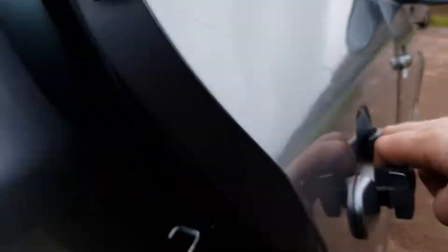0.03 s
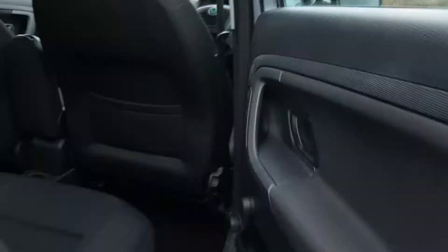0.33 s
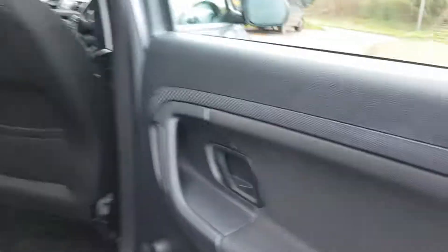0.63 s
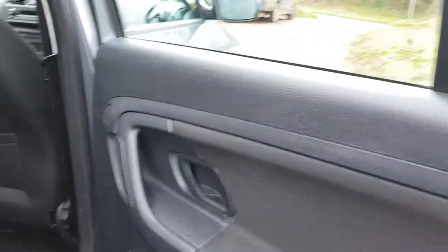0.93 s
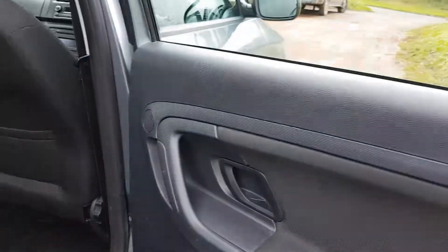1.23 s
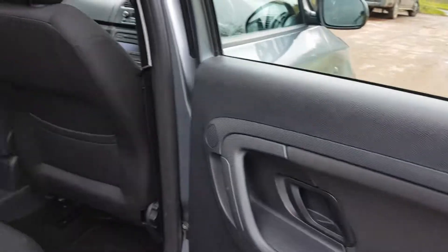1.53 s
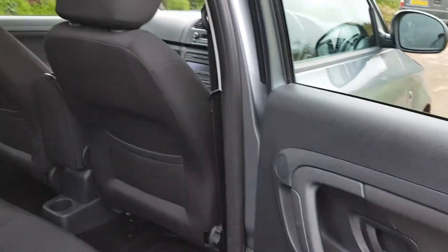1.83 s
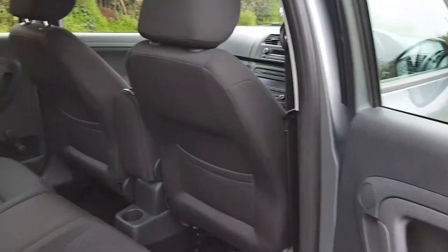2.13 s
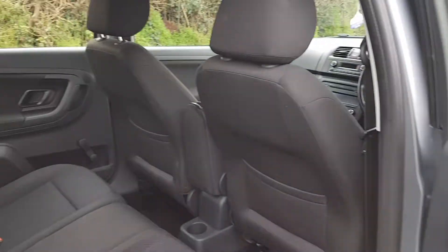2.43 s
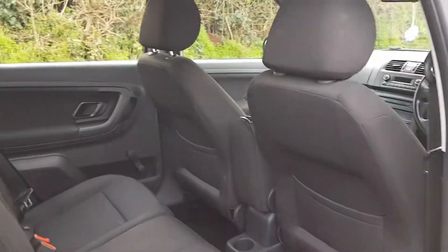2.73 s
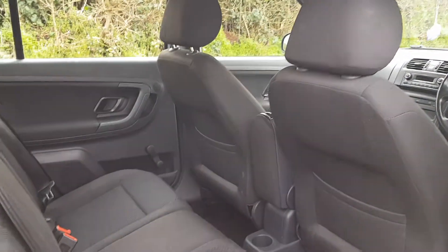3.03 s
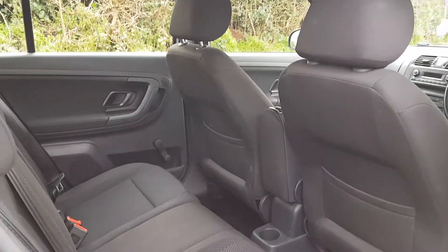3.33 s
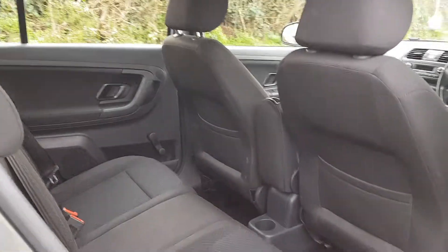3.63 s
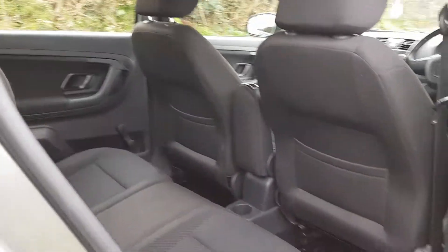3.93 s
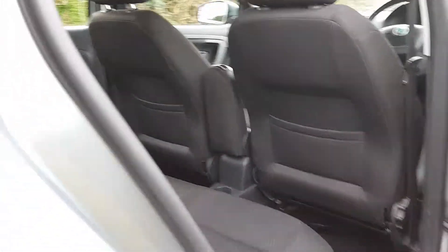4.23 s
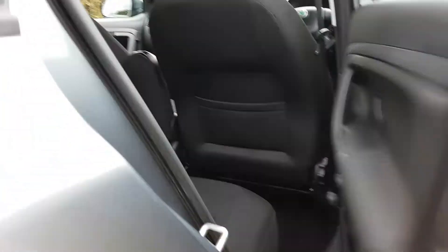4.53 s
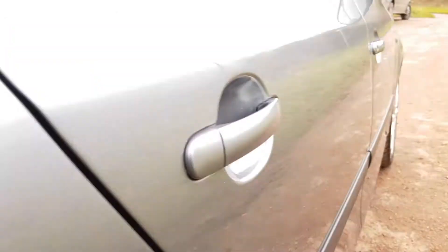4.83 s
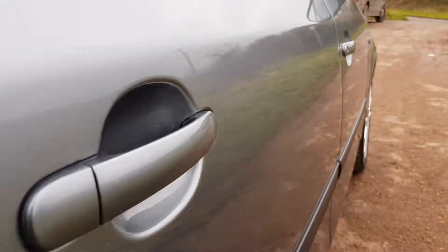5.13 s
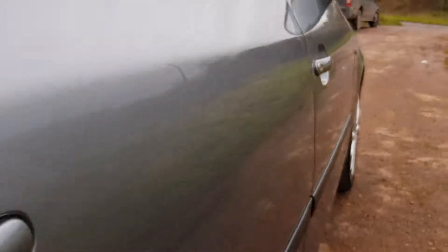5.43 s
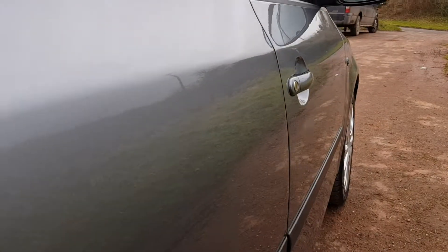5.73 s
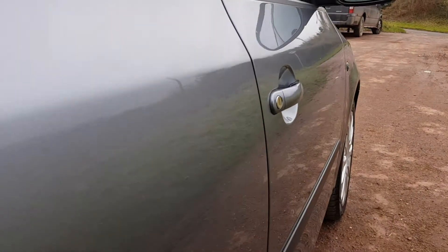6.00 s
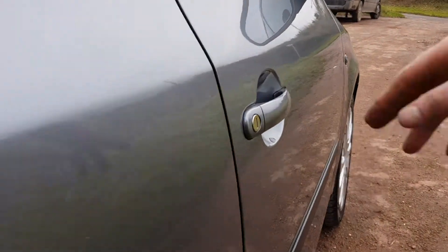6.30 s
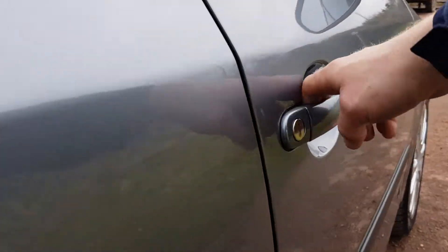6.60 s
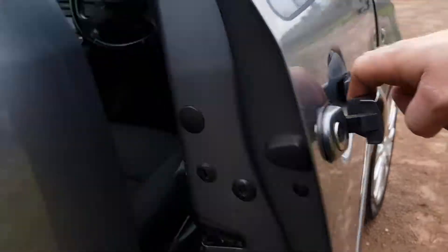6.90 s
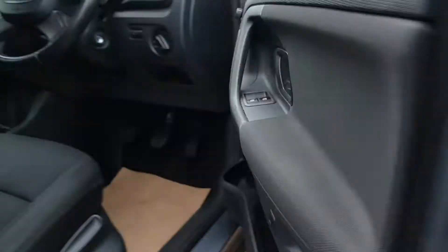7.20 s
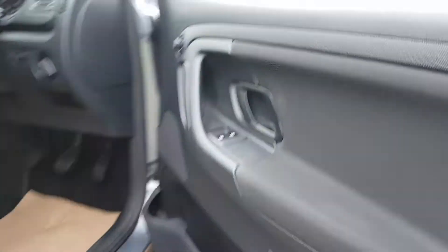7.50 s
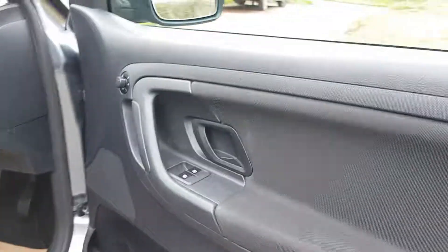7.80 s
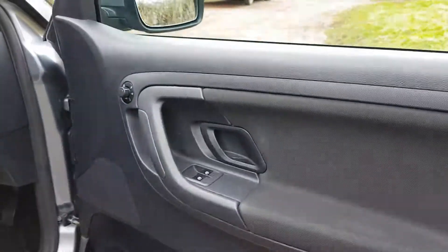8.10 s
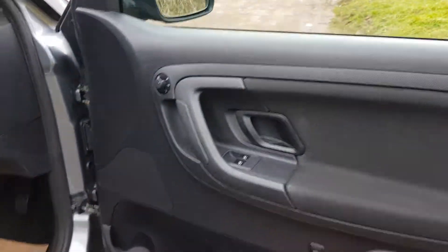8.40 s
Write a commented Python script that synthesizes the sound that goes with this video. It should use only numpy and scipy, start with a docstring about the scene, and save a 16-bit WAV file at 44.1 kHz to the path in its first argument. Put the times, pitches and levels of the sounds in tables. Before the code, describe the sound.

Wind buffets a hand-held microphone beside a parked car, with strong, low rumbling and irregular thumps for the first two seconds. At about 0.35 seconds a car door unlatches close by with a short clunk. Small birds chirp faintly from around 0.8 to 2.1 seconds. The wind nearly drops away at 2.5 seconds, then returns in lighter puffs, while faint tyre noise drifts from a distant road on the right. From 4.4 seconds the hinge ticks and creaks softly, and at about 4.85 seconds the door slams with a solid thud and a metallic latch crack. A sleeve rustles softly near the microphone. Around 6.4 seconds a handle starts clicking, and at 6.75 a second door opens with a sharp latch clack and a hollow thump. A light knock follows at 7.2 seconds amid more gusts, then a few small ticks until about 8.4 seconds.

```python
"""Wind hits the microphone first: gusts and eddies buffet its two ports, hand-held beside a parked car. Close
by, the rear door is unlatched and later slammed; then the front handle is pulled and that door opens. Each blow
rings the door panels and cracks in the steel latch; the slam puffs air from the seal. A sleeve rustles near the
microphone, small birds call from the hedge and tyres rush on a distant road to the right. Faint tyre tones and
high whines come and go, and a hinge creaks before the slam."""
import sys
import numpy as np
from scipy import signal
from scipy.fft import rfft, irfft, next_fast_len
from scipy.io import wavfile
from scipy.ndimage import uniform_filter1d

SR = 44100
rng = np.random.default_rng(int(sys.argv[2]) if len(sys.argv) > 2 else 0)


def master_out(mix):
    """Clip the mix to full scale and print it as 16-bit PCM to the path in sys.argv[1]."""
    frames = np.transpose(np.atleast_2d(mix))
    ceiling = np.clip(frames, -1, 1)
    pcm = np.round(ceiling * 32767).astype(np.int16)
    wavfile.write(sys.argv[1], SR, pcm)


N = 381553

# Levels are relative within each layer, spectra are per Hz, and pan runs from 0 (left) to 1 (right).
# traffic on the distant road: t/s, level/dB
ROAD_LEVEL = [(2.45, -50), (3.05, -42), (3.7, -45), (4.6, -38.5), (5.9, -44), (6.45, -36.5), (7.1, -38.5),
              (7.5, -46.5), (8.3, -41.5)]
# spectra of far tyres and of open air: f/Hz, level/dB
TYRE_SPECTRUM = [(30, -9), (120, 4), (270, -14), (380, -4.5), (520, -19), (720, -2.5), (920, 5),
                 (1200, -0.5), (1550, -7), (1850, -8.5), (2400, -18), (3100, -32), (6000, -67),
                 (16000, -43)]
AIR_SPECTRUM = [(30, 1), (150, -18), (300, -5), (390, 5.5), (510, -3), (700, 8.5), (1200, -22),
                (2800, -25.5), (5000, -52), (7500, -35.5), (9000, -51), (16000, -42)]
# faint thin, wavering bands of noise (tones from the distant road's tyres, a hinge creak before the slam, high
# whines): t/s, length/s, f/Hz, width/Hz, level/dB
THIN_WHINES = [(1.799, 0.72, 730, 110, -62), (2.6, 0.77, 487, 110, -56.5), (3.743, 0.42, 1870, 150, -58.5),
               (4.371, 0.33, 1840, 220, -62), (4.423, 0.17, 2500, 300, -64), (4.511, 0.27, 3110, 900, -61),
               (4.461, 0.15, 4800, 900, -63.5), (7.7, .5, 3700, 400, -69), (7.716, .48, 5800, 300, -75),
               (8.051, .7, 1080, 200, -54.5)]

# quick bird notes from the hedge: t/s, length/s, start f/Hz, end f/Hz, level/dB
BIRD_CHIRPS = [(0.75, 0.034, 5120, 4730, -56), (0.864, 0.041, 5900, 5900, -58),
               (1.028, .02, 5430, 4900, -65), (1.078, 0.024, 6270, 4100, -50.5),
               (1.091, .016, 6150, 5300, -52.5), (1.148, 0.02, 5300, 3950, -49),
               (1.185, .018, 6100, 5800, -63), (1.215, .018, 5430, 4400, -61),
               (1.245, 0.018, 5400, 3770, -53), (1.306, 0.027, 5600, 3740, -46.5),
               (1.352, .018, 5400, 4530, -57), (1.41, 0.022, 6400, 4300, -49.5),
               (1.42, 0.24, 4900, 4250, -69)]
# thin, raspy high calls: t/s, length/s, f/Hz, upward bow/Hz, rasp/Hz, level/dB
BIRD_SEEPS = [(1.777, .08, 7610, 359, 260, -51.5), (1.945, .035, 7380, 0, 80, -68),
              (2.026, .108, 7230, 60, 130, -56), (5.654, .22, 8230, 100, 250, -67)]

# cloth moving with the arm, close to the microphone: t/s, rub/dB, hiss/dB
SLEEVE_LEVEL = [(0, -64, -80.5), (.95, -65, -74.5), (1.1, -67, -87), (2.6, -76, -88.5), (3.65, -66, -86),
                (4.3, -60, -75.5), (4.62, -58, -67.5), (5.05, -60.5, -82), (5.95, -67, -87.5),
                (6.07, -59, -71), (6.45, -55, -65), (6.9, -55, -69.5), (7.05, -60, -70), (8.12, -57, -70.5),
                (8.23, -61.5, -65.5), (8.65, -58, -70)]
# quick brushes of cloth, and a short scrape just before the latch gives: peak t/s, length/s, rub/dB, hiss/dB
SLEEVE_BRUSHES = [(0.246, 0.047, -61, -77), (0.342, .024, -46, -65.5), (0.82, 0.079, -53.5, -90),
                  (3.516, 0.24, -59, -71.5), (3.957, 0.083, -69, -71), (6.703, .08, -45.5, -72)]
# spectra of the rub and of the fine hiss, which also tops the clicks: f/Hz, level/dB
RUB_SPECTRUM = [(1200, -8.5), (2400, 2.5), (3000, 1), (3700, -0.5), (4400, 0), (5700, -5), (6800, -6),
                (10000, -16), (16000, -39)]
HISS_SPECTRUM = [(4000, -6.5), (7500, -5.5), (10500, -4.5), (13000, -4), (16000, -9)]

# wind at the microphone: t/s, level/dB
WIND_LEVEL = [(0, -16), (.15, -25), (.39, -14), (.45, -17), (.472, -22.5), (.5, -20), (.79, -21.5),
              (.825, -38), (.88, -21.5), (1.1, -20), (1.18, -36), (1.27, -30.5), (1.5, -24), (1.59, -21),
              (1.71, -33.5), (1.88, -28), (1.945, -40.5), (1.98, -33.5), (2.2, -36.5), (2.24, -48),
              (2.56, -72.5), (2.64, -49), (2.9, -47), (3.2, -39.5), (3.65, -38), (3.88, -39), (4.15, -36),
              (4.75, -36.5), (5.12, -50.5), (5.55, -35.5), (5.85, -36), (6.28, -27), (6.42, -36.5),
              (6.95, -34), (7.17, -25), (7.8, -42.5), (8.22, -37.5), (8.6, -52.5)]
# which port faces the wind: t/s, left minus right/dB
WIND_BALANCE = [(0, -0.5), (.45, 1.5), (.65, -12.5), (1.05, 5.5), (1.29, 23), (1.37, 8), (1.6, -7.5),
                (2.0, 0)]
# puffs that stand out of the wind: peak t/s, length/s, level/dB, pan
WIND_PUFFS = [(0.146, 0.17, -16, 0.35), (0.212, 0.051, -14.5, 0), (0.861, 0.11, -24, 1),
              (1.101, 0.1, -21, 0.019), (1.382, 0.072, -17.5, 0.65), (1.493, 0.1, -23, 1),
              (1.777, 0.11, -24.5, 0.93), (1.861, 0.089, -26, 0.58), (2.623, 0.044, -34.5, 0.52),
              (2.736, 0.043, -40.5, 0.067), (3.179, 0.22, -33.5, 0.52), (3.416, 0.053, -31.5, 0.49),
              (3.472, 0.13, -30, 0.46), (3.797, 0.19, -38, 0.5), (4.674, 0.059, -28.5, 0.46),
              (5.45, 0.13, -29, 0.29), (5.661, 0.0294, -24.5, 0.52), (6.029, 0.082, -25.5, 0.59),
              (6.592, 0.0923, -25.5, 0.73), (6.808, 0.049, -28.5, 0.61), (6.915, 0.0274, -26.5, 0.92),
              (7.092, 0.062, -22, 0.2), (7.188, 0.163, -22.5, 0.036), (7.368, 0.1, -29, 0.29),
              (7.507, 0.15, -23, 0.455), (7.653, 0.11, -29, 0.18), (8.144, 0.217, -37, 0.93)]
# spectra of buffeting in strong and in light flow, and of an eddy's flutter: f/Hz, level/dB
STRONG_FLOW_SPECTRUM = [(15, -40.5), (35, -8.5), (80, 1.5), (170, -2), (280, -6.5), (500, -17),
                        (900, -34.5), (1500, -47.5), (2500, -61.5), (4000, -82.5), (8000, -100)]
LIGHT_FLOW_SPECTRUM = [(15, -24), (35, -10.5), (80, -0.5), (130, -1), (230, -5), (370, -2.5), (550, -8),
                       (900, -16), (1500, -28.5), (2500, -52.5), (4000, -52), (8000, -100)]
FLUTTER_SPECTRUM = [(150, 8), (450, 3.5), (1000, -5), (1800, -11.5), (3000, -31), (4200, -57.5)]
# single eddies that slap the ports, and short scuffs near 8.1 s: t/s, level/dB, pan
EDDY_SLAPS = [(.055, -15, 0.74), (.096, -17, 0.75), (.298, -26, .7), (0.1856, -10, 0.0043),
              (0.202, -9, 0.026), (0.233, -4.5, 0.97), (.406, -9, 0.041), (.432, -7, 0), (.442, -8, 0.067),
              (0.516, -11, 0), (0.5782, -1.5, 0.91), (0.619, -10, 1), (0.626, -4, 0.96),
              (0.63, -2.5, 0.994), (.7, -10, 1), (0.806, -18.5, 0.71), (0.8392, -14.5, 0.68),
              (0.844, -22, 0.61), (0.848, -3.5, 0.96), (0.8506, -17, 0.61), (0.863, -7, 1),
              (0.952, -15, 0.087), (0.972, -14.5, 0.95), (0.995, -14.5, 0.26), (1.042, -19, .5),
              (1.371, -12, .8), (1.39, -13.5, 1), (1.483, -18.5, .9), (1.555, -16.5, 0.98), (1.587, -5, 1),
              (1.76, -21, 0.67), (1.888, -21, .8), (1.992, -24, 0.73), (2.08, -23.5, 0.077),
              (3.404, -23, 0.85), (4.064, -18.5, 1), (4.09, -19.5, 0.97), (4.191, -15, 0.98),
              (4.669, -16, 0.94), (5.454, -11.5, 0.99), (6.021, -25, 0.17), (6.199, -18, 0.32),
              (7.009, -15, 0.47), (7.364, -11.5, 1), (7.374, -13.5, 0.98), (7.491, -11, 1),
              (7.528, -18, .3), (8.096, -21.5, 0.91), (8.123, -18, 0.86), (8.15, -17.5, .8)]
# large eddies, each a hollow bump: t/s, level/dB, f/Hz, pan
EDDY_BUMPS = [(0.154, -3.5, 196, 0), (0.187, -0.5, 180, 0.0), (0.3, -9.5, 250, 0.76), (0.312, -6, 150, 0.5),
              (0.442, -3, 267, 0.03), (0.497, -5.5, 237.5, 0.48), (0.854, -1, 140, 1.0),
              (1.115, -12.5, 207.5, 0), (1.378, -11, 240, 1), (1.492, -17, 150, 0.68),
              (1.666, -10.5, 167, 0.65), (3.163, -16, 285, 1), (3.406, -9.5, 416, 0.71),
              (3.494, -13.5, 328, 0.45), (3.704, -15.5, 364, 0.69), (3.786, -19.5, 252, 0.6),
              (4.139, -16.5, 328, 0.42), (5.424, -12, 317, 0.6), (5.455, -19, 358, 1),
              (5.485, -13, 435, 0.036), (5.613, -19, 392, 1), (5.67, -14.5, 506, 1),
              (6.018, -6.5, 380, 0.63), (6.028, -10.5, 352, 0.051), (6.213, -7, 443, 0.41),
              (6.233, -10.5, 396, 0.73), (6.3, -11.5, 347, 0), (6.354, -12, 375, 0.38),
              (6.823, -7.5, 343, 0.52), (6.912, -20.5, 351, 0.012), (7.009, -13, 350, 0.58),
              (7.071, -13, 289, 1), (7.161, -20, 344, 0.1), (7.194, -8, 410, 0.28), (7.242, -10, 410, 0.87),
              (7.266, -10, 307, 0.76), (7.349, -14, 303, 0), (7.465, -7.5, 372, 0.89),
              (7.509, -13, 291, 0.33), (7.528, -3, 390, 0.28), (7.603, -17.5, 277, 0.76),
              (7.931, -19.5, 273, 0.49), (8.137, -23, 312, 0.65), (8.197, -18.5, 284, 0),
              (8.275, -23, 350, 0.91)]

# ticks of hinge, handle and trim: t/s, level/dB, hiss against the tick/dB, ring f/Hz
PART_CLICKS = [(1.272, -47.5, -28, 3900), (1.294, -44.5, -21, 3700), (4.3959, -40.5, -20, 4500),
               (4.5387, -36, -29.5, 3200), (4.563, -30, -26.5, 3120), (4.632, -33, -31, 3120),
               (4.652, -25, -38, 3150), (4.669, -29.5, -36, 2600), (4.715, -30.5, -9.5, 3300),
               (4.753, -27, -32, 3200), (6.4143, -30, -39, 3600), (6.5428, -32.5, -1, 4100),
               (6.603, -28, -1, 4400), (6.676, -34, -27, 5200), (6.69, -32, -12, 4500),
               (6.697, -33, 3.5, 4400), (6.7145, -23, -12, 3900), (7.1577, -34.5, -15, 3630),
               (7.5525, -40, -10, 3670), (7.7631, -28.5, -23, 3630), (8.162, -30.5, -29, 1500),
               (8.358, -41, -6.5, 4200), (8.4162, -31, -30, 2050)]
# the door skin flexing as the latch catches and the seal is pressed or lets go:
# t/s, level/dB, f/Hz, half length/cycles
SKIN_THUMPS = [(4.8273, -6.5, 273, .9), (4.8536, -3, 280, 0.59), (6.7339, -10.5, 310, 1.34),
               (6.757, -12.5, 218, 0.69)]
# blows of latch and door: t/s, thud/dB, crack/dB, crack t60/s, crack cutoff/Hz, sparkle/dB
DOOR_BLOWS = [(0.3499, -38.5, -25.5, 0.04, 15700, -39), (0.355, -16.5, -16.5, 0.047, 16000, -42),
              (.36, -15.5, -23.5, 0.063, 15800, -44), (4.8047, -20.5, -28, 0.11, 2000, -69),
              (4.808, -19, -23.5, 0.065, 5000, -59), (4.817, -17.5, -20, 0.054, 6020, -59),
              (4.8243, -8, -12, 0.1, 16100, -33.5), (4.8333, -13.5, -12, 0.039, 16060, -34.5),
              (4.8515, -8, -16, 0.035, 16070, -27), (4.859, -14.5, -26.5, 0.11, 16100, -56),
              (4.883, -19.5, -26.5, 0.045, 16000, -40.5), (4.898, -21, -37, .04, 6000, -65),
              (4.966, -34.5, -42, 0.057, 16000, -60.5), (6.731, -24, -36, 0.08, 9000, -55),
              (6.7414, -12, -20, 0.0172, 9000, -36), (6.75, -23.5, -34, 0.038, 5000, -59),
              (7.222, -31, -24.5, 0.031, 4830, -51.5), (7.232, -23, -35, 0.052, 5260, -45)]
# where the struck door stands from the microphone: t/s, lag of the left port/s
DOOR_BEARING = [(.4, .0004), (4.8, -.00025), (5, -.00025), (6.7, 0), (7.3, .0003)]
# modes of the door panels with their cavities, and of the latch steel: f/Hz, level/dB, t60/s
REAR_DOOR_MODES = [(61.5, -3.5, 0.24), (84.7, -3, 0.16), (112, -8, 0.12), (141.7, -18, 0.32),
                   (198.3, -14.5, 0.29), (242.2, 2, 0.16), (271, -4, 0.12), (338.6, -8.5, 0.19),
                   (405, -17, 0.23), (480, -9.5, 0.13), (558, -7, 0.115), (601, -10.5, 0.081),
                   (810, -4, 0.071), (894, -2, 0.083), (977, -2, 0.1), (1530, -19.5, 0.27)]
FRONT_DOOR_MODES = [(149.8, -5, 0.17), (228, -11, 0.15), (377, -0.5, 0.044), (490, -5, .085),
                    (552, -2.5, 0.18), (744, -0.5, 0.069), (1170, 2.5, 0.042), (1300, 6, 0.027),
                    (2040, -0.5, 0.024), (2430, -8.5, 0.05), (3830, -6.5, 0.022), (4900, -14, .025)]
LATCH_MODES = [(1610, 4, 0.11), (1895, -5, .1), (2164, 1, 0.094), (2309, -2, .09), (2410, 0, .09),
               (2660, 3, .12), (2920, -2, 0.092), (3160, 2.5, 0.087), (3390, 0, 0.1), (3530, 0, .09),
               (3800, -1, .08), (4030, -3.5, 0.071), (4370, -2.5, .08), (4950, -6, .11)]
# spectra of a plastic tick, the seal's puff, clattering lining, the steel crack and its top:
# f/Hz, level/dB
PLASTIC_SPECTRUM = [(500, 11.5), (1500, 9.5), (2600, -1), (3700, -2), (6000, -3), (8500, -13), (16000, -20)]
SEAL_SPECTRUM = [(150, -18), (300, -4), (420, 3), (700, -9), (950, 11.5), (1120, -2.5), (1300, -22.5),
                 (1600, -28), (4000, -53)]
LINING_SPECTRUM = [(20, -12), (40, -3), (100, 4), (190, -4.5), (290, 0), (550, 1), (720, -18), (900, -3),
                   (1150, -11), (2000, -25), (4000, -48)]
STEEL_SPECTRUM = [(200, 1), (500, -7.5), (1000, -0.5), (1600, 2), (1850, -6.5), (2170, -1), (2600, -10),
                  (3400, -7), (6000, -13), (8700, -26), (11000, -27), (16000, -41.5)]
SPARKLE_SPECTRUM = [(4000, -14), (7000, -2.5), (8800, -15), (11000, -5), (13000, -16), (16000, -16.5)]


def amp(db):
    """Decibels to gain."""
    return 10 ** (np.asarray(db) / 20)


def unit(x):
    """Scale to rms 1."""
    return x / np.sqrt(np.mean(x ** 2) + 1e-20)


def curves(rows):
    """One value per sample for each column after the time."""
    s, *cols = np.transpose(rows)
    return [np.interp(np.arange(N) / SR, s, c) for c in cols]


def wobble(rate, size=N):
    """A smooth random curve, rate knots a second."""
    knots = rng.standard_normal(int(size * rate / SR) + 4)
    fine = signal.resample_poly(knots, up=8, down=1)
    return np.interp(np.arange(size) * rate / SR * len(fine) / len(knots), np.arange(len(fine)), fine)


def filtered(x, response):
    """x times a response of frequency."""
    n = x.shape[-1]
    m = next_fast_len(n + 8192)
    return irfft(rfft(x, m) * response(np.fft.rfftfreq(m, 1 / SR)), m)[..., :n]


def lowpass(x, cutoff_hz, order=4):
    """Roll off the treble, 6 dB down at the cutoff."""
    return filtered(x, lambda hz: 1 / (1 + (hz / cutoff_hz) ** order))


def noise(spectrum, alike, size=N):
    """Stereo noise of rms 1 with a given spectrum and left-right likeness."""
    mid, side = rng.standard_normal((2, size))
    turn = np.arccos(np.clip(alike, -1, 1)) / 2
    white = np.cos(turn) * mid + np.sin(turn) * np.array([side, -side])
    f, db = np.transpose(spectrum)
    return unit(filtered(white, lambda hz: amp(np.interp(np.log(hz + 1), np.log(f), db))))


def add(track, s, sound):
    """Mix a sound into a track at time s."""
    part = track[:, max(round(s * SR), 0):][:, :sound.shape[-1]]
    part += sound[..., :part.shape[1]]


def swell(s, length):
    """A smooth rise and fall, 1 at time s."""
    out = np.zeros((1, N))
    add(out, s - length / 2, np.hanning(int(length * SR)))
    return out[0]


def panned(pan):
    """The shares of the left and the right port."""
    return np.array([[1 - pan], [pan]])


def lagged(pair, lag):
    """The left port hears the sound lag seconds after the right one."""
    return filtered(pair, lambda hz: np.exp(1j * np.pi * hz * lag * np.array([[-1], [1]])))


def echo(x, t60):
    """A diffuse tail of unit energy, different at each port."""
    tail = rng.standard_normal((2, SR // 2)) * amp(-60 * np.arange(SR // 2) / SR / t60)
    return signal.fftconvolve(x, tail / np.linalg.norm(tail[0]), axes=1)[:, :N]


def road():
    """Far off to the right: tyres on a road, over the steady murmur of open air."""
    level_db, = curves(ROAD_LEVEL)
    tyres = amp(level_db + 0.29 * wobble(rate=8.1)) * noise(TYRE_SPECTRUM, alike=0.37)
    air = amp(-51.5) * noise(AIR_SPECTRUM, alike=0.99)
    return lagged(tyres + air, lag=0.00039)


def whines():
    """Tyre tones from the distant road, a hinge creak and high whines: thin bands of noise that waver in pitch
    and level."""
    waver_hz, flicker_db, rate = 18.1, 3, 49
    out = np.zeros((2, N))
    for s, length, hz, width_hz, db in THIN_WHINES:
        size = int(length * SR)
        white = rng.standard_normal((2, size))
        band = filtered(white, lambda f: 1 / (1 + (2 * (f - hz) / width_hz) ** 2))
        waver = np.exp(2j * np.pi * np.cumsum(waver_hz * wobble(rate, size)) / SR)
        band = (signal.hilbert(band) * waver).real * amp(flicker_db * wobble(rate, size))
        add(out, s, amp(db + 7.5) * unit(band) * signal.windows.tukey(size, .5))
    return out


def whistle(pitch, rasp_hz):
    """One bird note that swells and fades along a quavering pitch."""
    u = np.linspace(0, 1, len(pitch))
    quavering = pitch + rasp_hz * wobble(rate=950, size=len(u))
    return np.sin(np.pi * u ** 1.6) * np.sin(2 * np.pi * np.cumsum(quavering) / SR)


def birds():
    """From the hedge: falling flicks and high calls, scattered by twigs, with a duller echo behind."""
    arch_hz, end_drop_hz = 151.5, 1150
    calls = np.zeros((2, N))
    for s, length, start_hz, end_hz, db in BIRD_CHIRPS:
        u = np.linspace(0, 1, int(length * SR))
        pitch = start_hz + (end_hz - start_hz) * u + arch_hz * np.sin(np.pi * u)
        add(calls, s, amp(db) * whistle(pitch, rasp_hz=260))
    for s, length, hz, bow_hz, rasp_hz, db in BIRD_SEEPS:
        u = np.linspace(0, 1, int(length * SR))
        pitch = hz + bow_hz * np.sin(np.pi * u) - end_drop_hz * u ** 6
        add(calls, s, amp(db) * whistle(pitch, rasp_hz))
    hedge = lowpass(echo(calls, t60=0.5), cutoff_hz=7400, order=6)  # leaves swallow the top
    twigs = echo(calls, t60=0.039)
    return amp(-7.5) * calls + twigs + amp(-5) * hedge


def sleeve():
    """Close to the microphone: cloth rubs as the arm moves, a dull rub and a fine, grainy hiss."""
    rub_gain, hiss_gain = amp(curves(SLEEVE_LEVEL))
    for s, length, rub_db, hiss_db in SLEEVE_BRUSHES:
        stroke = swell(s, length)
        rub_gain += amp(rub_db) * stroke
        hiss_gain += amp(hiss_db) * stroke
    rub = rub_gain * amp(-.5) * noise(RUB_SPECTRUM, alike=0.047)
    hiss = hiss_gain * amp(8.5) * noise(HISS_SPECTRUM, alike=0.092)
    rustle = sum(layer * amp(1.1 * wobble(rate=15)) for layer in (rub, hiss))
    grain = amp(1.2 * wobble(rate=300))
    return grain * rustle * amp([[.7], [-.7]])  # a little to the left


def push_pull(u):
    """Pressure of an eddy at u crossing times from the port, peak 1."""
    shape = -u / (1 + u * u) ** 2
    return shape / shape.max()


def crackle(strength):
    """Small eddies hit each port at random, the harder the stronger the wind there."""
    hits_per_s, spread_db, crossing_s = 55, 2, 0.0006
    hits = (rng.random((2, N)) < hits_per_s / SR) * np.sign(rng.standard_normal((2, N)))
    size = amp(-3.5 + spread_db * np.clip(rng.standard_normal((2, N)), -2, 2))
    u = np.arange(-SR // 200, SR // 200) / SR / crossing_s
    return signal.fftconvolve(hits * size * strength, push_pull(u)[None], mode="same", axes=1)


def eddies():
    """An eddy passing a port pushes, then sucks, the air in it, amid a short flutter."""
    flutter_fade_s = 0.0059
    out, t = np.zeros((2, N)), np.arange(-SR // 50, SR // 50) / SR
    for s, db, pan in EDDY_SLAPS:
        crossing_s = 0.00055 / amp(0.3 * (db + 12.5))  # strong ones pass faster
        flutter = noise(FLUTTER_SPECTRUM, alike=0, size=len(t))[0] * np.exp(-np.abs(t) / flutter_fade_s)
        slap = push_pull(t / crossing_s) + amp(-17) * flutter
        add(out, s + t[0], amp(db) * slap * panned(pan))
    return lowpass(out, cutoff_hz=2400)  # the narrow port dulls it


def bumps():
    """A large eddy rocks the air in the ports for a cycle or two; flutter rides on its crests."""
    half_length_cycles, flutter_share = 0.73, 0.11
    out, t = np.zeros((2, N)), np.arange(-SR // 40, SR // 40) / SR
    for s, db, hz, pan in EDDY_BUMPS:
        phase = 2 * np.pi * rng.random() + 0.69 * rng.standard_normal((2, 1))
        wave = np.exp(-(t * hz / half_length_cycles) ** 2) * np.sin(2 * np.pi * hz * t + phase)
        wave *= 1 + flutter_share * noise(FLUTTER_SPECTRUM, alike=0, size=len(t))
        add(out, s + t[0], amp(db - 1.5) * wave * panned(pan))
    return out


def wind_power():
    """Power at each port: shared gusts, its own sway and puffs, with more on the windward side."""
    wind_db, = curves(WIND_LEVEL)
    balance_db, = curves(WIND_BALANCE)
    facing = amp(np.array([balance_db, -balance_db]) / 2) ** 2
    sway_db = 2 * np.array([wobble(rate=17), wobble(rate=17)])
    gust_db = 1.56 * wobble(rate=8)
    power = amp(wind_db + gust_db + sway_db) ** 2 * facing / facing.mean(axis=0)
    for s, length, db, pan in WIND_PUFFS:
        power += amp(db) ** 2 * swell(s, length) * 2 * panned(pan)
    return power


def buffeting():
    """Right on the microphone: turbulence at each port, strong and deep until the car shelters it."""
    split_hz, even_flow_db, brightening = 400, -18.5, 0.39
    power = wind_power()
    shelter, = curves([(2.2, 0.017), (3.1, 0.99)])  # t/s, share of light flow
    flow = np.sqrt(1 - shelter) * noise(STRONG_FLOW_SPECTRUM, alike=0)
    flow += np.sqrt(shelter) * noise(LIGHT_FLOW_SPECTRUM, alike=0.17)
    swirl = np.array([wobble(rate=70), wobble(rate=70)])
    deep = lowpass(flow, split_hz)
    # faster air, in a gust or in a swirl, is louder and, above all, brighter
    edge_db = 7 * swirl + brightening * (10 * np.log10(power.mean(axis=0)) - even_flow_db)
    flow = deep * amp(3.5 * swirl) + (flow - deep) * amp(edge_db)
    # the swirls only share out the power of the gust
    flow_power = np.abs(uniform_filter1d(flow ** 2, size=SR // 14)) + 1e-9
    return flow * np.sqrt(power / flow_power) + crackle(np.sqrt(power))


def clicks():
    """At the car: hinge stay, plastic handle and trim tick briefly, each at its own resonance."""
    ring_db, half_width_hz = 12.5, 380
    rise_s, t60 = 0.00066, 0.028
    out, t = np.zeros((2, N)), np.arange(SR // 10) / SR
    envelope = amp(-60 * t / t60) * (1 - np.exp(-t / rise_s))
    for s, db, hiss_db, ring_hz in PART_CLICKS:
        plastic = noise(PLASTIC_SPECTRUM, alike=0.16, size=len(t))
        part = filtered(plastic, lambda f: 1 + amp(ring_db) / (1 + ((f - ring_hz) / half_width_hz) ** 2))
        tick = unit(part) + amp(hiss_db) * noise(HISS_SPECTRUM, alike=.2, size=len(t))
        add(out, s, amp(db - 2) * tick * envelope)
    return out


def seal():
    """In the slam the rubber seal is crushed against the frame and drives out a dense puff of air."""
    slam_s, rise_s, t60 = 4.851, .002, 0.12
    out, t = np.zeros((2, N)), np.arange(SR // 4) / SR
    envelope = amp(-19.5 - 60 * t / t60) * (1 - np.exp(-t / rise_s))
    add(out, slam_s, envelope * noise(SEAL_SPECTRUM, alike=0.54, size=len(t)))
    return out


def thumps():
    """The door skin swings for a cycle or two, a hollow thump on both ports."""
    out, t = np.zeros((2, N)), np.arange(-SR // 40, SR // 40) / SR
    for s, db, hz, cycles in SKIN_THUMPS:
        add(out, s + t[0], -amp(db) * np.exp(-(t * hz / cycles) ** 2) * np.sin(2 * np.pi * hz * t))
    return out


def ring(modes, t):
    """Struck modes at fresh strengths; the higher ones reach the two ports less alike."""
    hz, db, t60 = np.transpose(modes)[:, :, None]
    strength, detune, skew = rng.standard_normal((3, len(modes), 1))
    decay = amp(db + 0.54 * strength - 60 * t / t60) * (1 - np.exp(-t / 0.00023))
    phase = 2 * np.pi * (hz + 5 * detune) * t + np.pi * np.arange(len(modes))[:, None]
    offset = skew * hz / 2200
    return np.array([np.sum(decay * np.sin(phase + side * offset), axis=0) for side in (1, -1)])


def door():
    """Close by: each blow rings a panel, shakes its lining and cracks in the latch, which rattles on."""
    front_door_from_s, rise_s, lining_t60, rattle_t60 = 6, 0.0004, 0.13, 0.3
    out, t = np.zeros((2, N)), np.arange(SR // 4) / SR
    attack = 1 - np.exp(-t / rise_s)
    for s, thud_db, crack_db, crack_t60, cutoff_hz, sparkle_db in DOOR_BLOWS:
        panel, latch_db = (FRONT_DOOR_MODES, -28) if s > front_door_from_s else (REAR_DOOR_MODES, -21)
        lining = noise(LINING_SPECTRUM, alike=0.57, size=len(t)) * attack * amp(-60 * t / lining_t60)
        thud = amp(-7) * ring(panel, t) + amp(-5) * lining
        burst = (amp(-60 * t / crack_t60) + amp(-35 - 60 * t / rattle_t60)) * attack
        crack = burst * noise(STEEL_SPECTRUM, alike=0.14, size=len(t))
        crack += amp(latch_db) * ring(LATCH_MODES, t)
        crack = lowpass(crack, cutoff_hz)  # a cushioned contact is duller
        sparkle = burst * noise(SPARKLE_SPECTRUM, alike=.1, size=len(t))
        bright = (amp(crack_db) * crack + amp(sparkle_db + 3.5) * sparkle) * amp([[.8], [-.8]])
        lag = np.interp(s, *np.transpose(DOOR_BEARING))
        add(out, s, lagged(amp(thud_db) * thud + bright, lag))
    return out


def scene():
    """Everything that reaches the two ports, from the spot beside the car."""
    wind = buffeting() + bumps() + eddies()
    return wind + road() + sleeve() + door() + thumps() + seal() + clicks() + whines() + birds()


def record(dry):
    """The hand-held recorder blocks slow drift, rounds off the highest peaks and limits the band."""
    low_cut_hz, top_hz = 15, 15850
    pressure = filtered(dry, lambda hz: 1j * hz / (1j * hz + low_cut_hz))
    rounded = pressure / (1 + pressure ** 8) ** (1 / 8)
    return filtered(rounded, lambda hz: hz < top_hz)


dry = scene()
out = record(dry)
master_out(out)
```